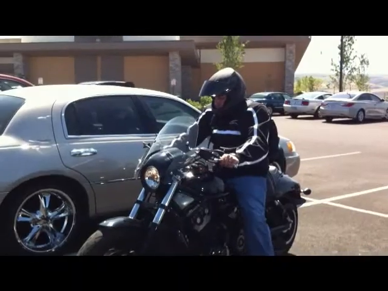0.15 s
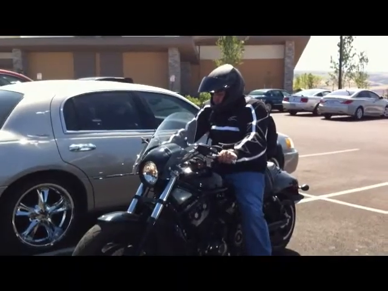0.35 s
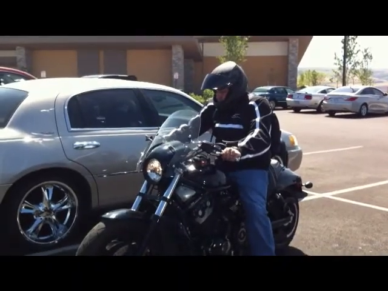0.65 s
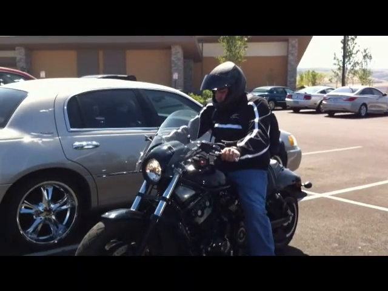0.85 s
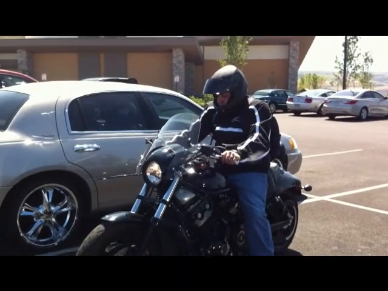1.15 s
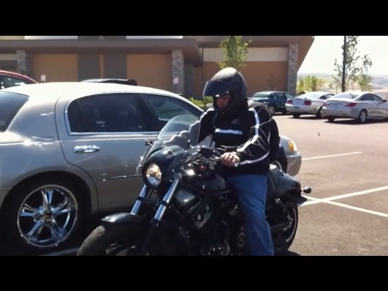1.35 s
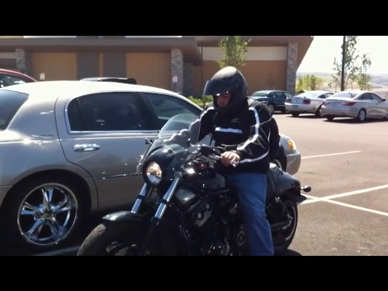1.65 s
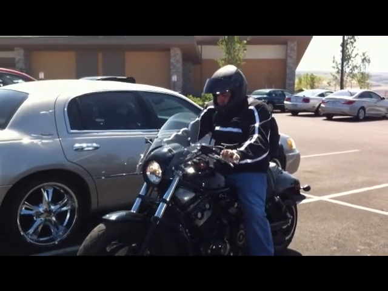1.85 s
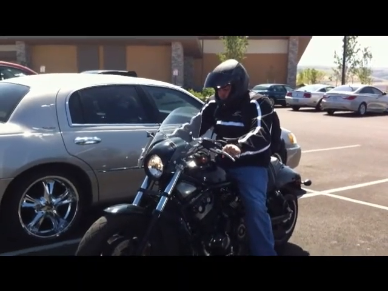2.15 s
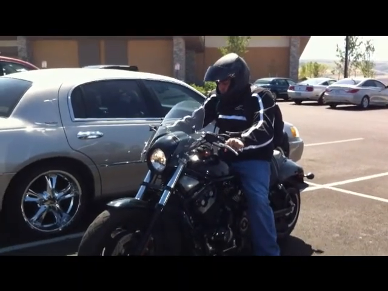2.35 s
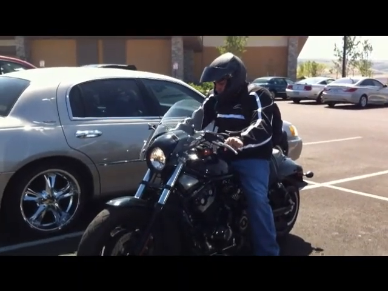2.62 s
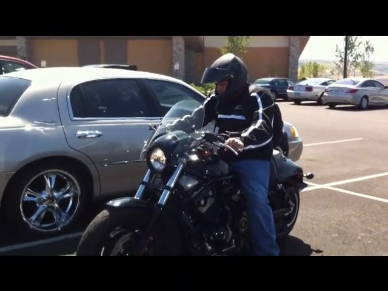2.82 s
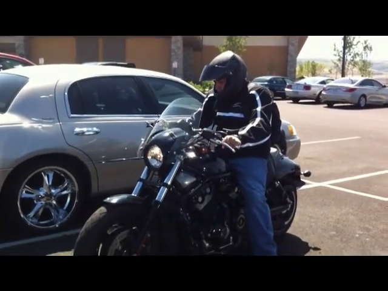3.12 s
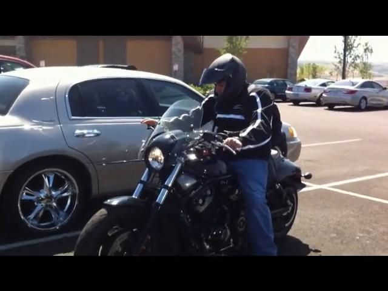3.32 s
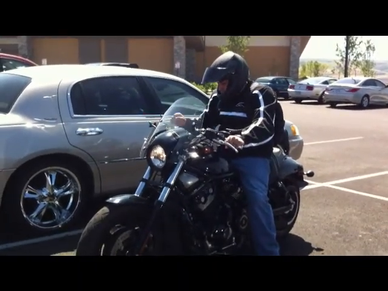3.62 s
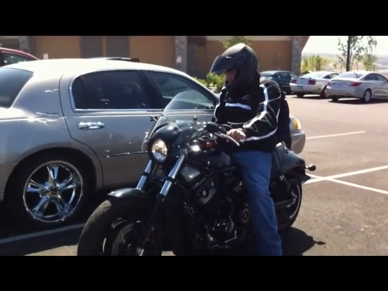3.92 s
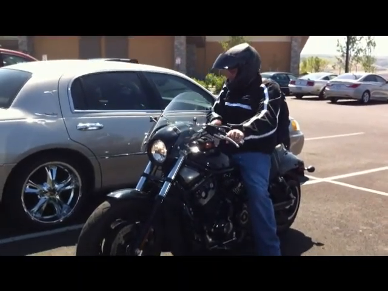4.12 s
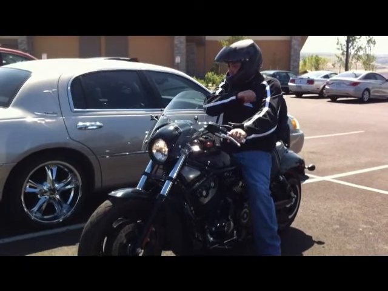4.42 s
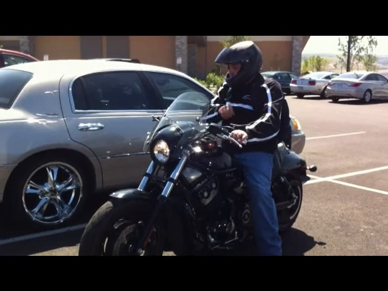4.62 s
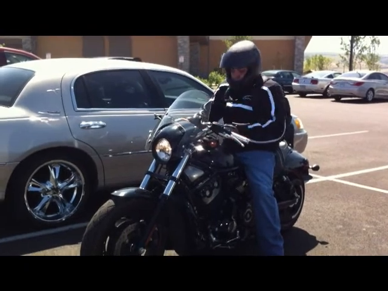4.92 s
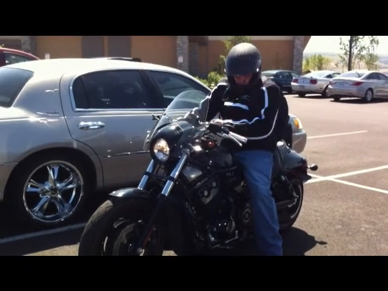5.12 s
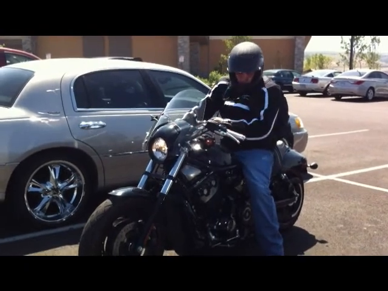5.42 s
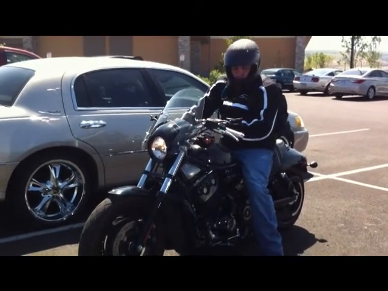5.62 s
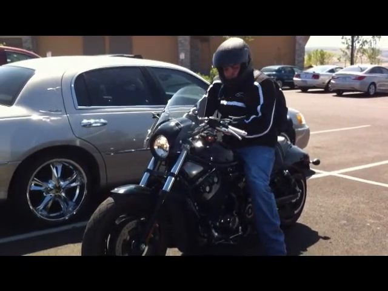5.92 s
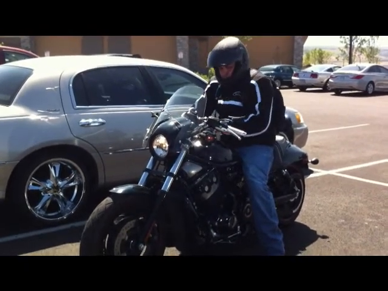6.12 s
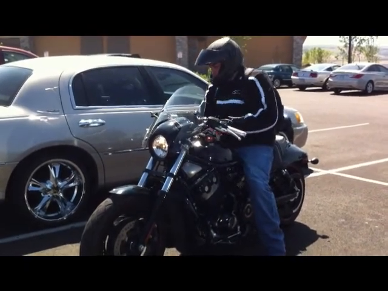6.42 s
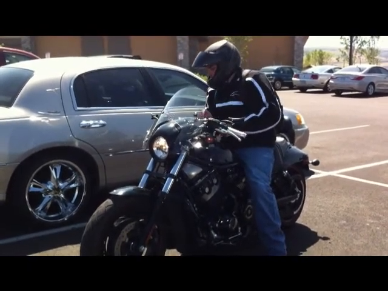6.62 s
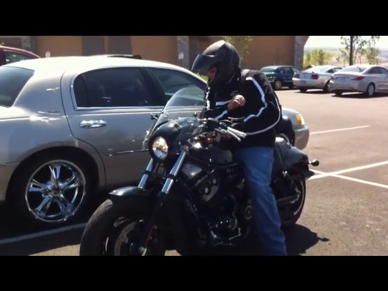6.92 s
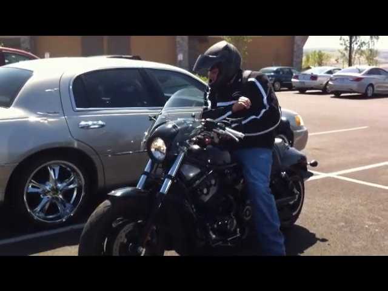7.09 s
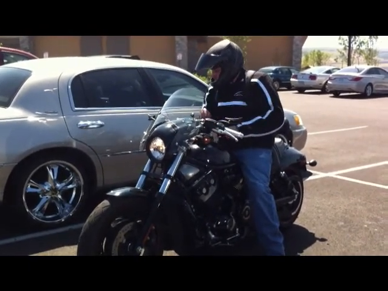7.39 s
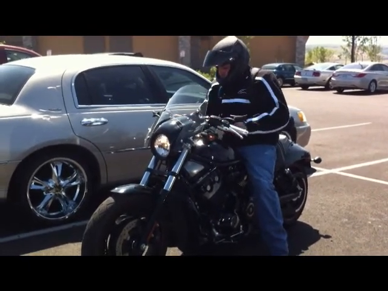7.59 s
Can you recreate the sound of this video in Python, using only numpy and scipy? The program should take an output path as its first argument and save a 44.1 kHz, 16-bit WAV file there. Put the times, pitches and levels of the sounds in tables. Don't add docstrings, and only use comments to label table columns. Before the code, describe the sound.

Faint distant traffic, then a quick metallic starter whine and hard clack as a two-cylinder motorcycle fires up close by. Three brief revs rise in pitch and force, each dropping back through stumbling, uneven firings. It then holds a slow, deep, galloping idle. Mechanical hiss, valve ticks, whining gears and thin chirps ride on top. The sound is outdoors, bouncing off asphalt, with a consumer microphone's dulled upper treble and one tiny splice click.

```python
import sys
import numpy as np
from scipy import signal
from scipy.fft import rfft, irfft, next_fast_len
from scipy.io import wavfile
from scipy.ndimage import map_coordinates

SR = 44100
rng = np.random.default_rng(int(sys.argv[2]) if len(sys.argv) > 2 else 0)


def amp(db):
    return 10 ** (np.asarray(db, float) / 20)


def write(x):
    x = np.atleast_2d(x).T
    wavfile.write(sys.argv[1], SR, np.round(np.clip(x, -1, 1) * 32767).astype(np.int16))


N = 341775
CUT, LOST = round(4.2365 * SR), round(.0163 * SR)
LONG = N + LOST
T = np.arange(LONG) / SR
SETTLED_S = 4.26
IDLE_RATE = 11.5
REAR_FIRES = .411

# f/Hz, level/dB per Hz
LOT_COLOUR = [(18, -67.5), (30, -21), (182, 5), (259, -4), (325, 1.5), (564, -17), (742, -11),
              (1140, -13.5), (12000, -38.5), (15600, -74), (22000, -120)]

# t/s, length/s, f/Hz, level/dB
GUARD_CHIRPS = [(.6, .2, 5420, 0), (1.5, .2, 5450, -2), (2.68, .08, 5520, -3), (2.99, .1, 5440, 0),
                (3.36, .14, 5450, -1), (3.55, .08, 5150, -3), (3.97, .15, 5480, -1), (5.2, .2, 4180, -2),
                (5.55, .12, 5850, -3), (6.65, .15, 5430, -1), (6.85, .06, 5520, -3), (7.38, .18, 5470, -1),
                (7.55, .15, 5700, -2)]

# share of the cycle, level/dB
ROCKER_KNOCKS = [(.2, -6), (0.297, -1.5), (.71, -3.5)]
# f/Hz, width/Hz, level/dB, polarity
ROCKER_COVER = [(2326, 100, 0.5, 0.95), (3100, 240, -6.5, -1.06)]

# f/Hz, level/dB per Hz
CASES_COLOUR = [(260, -21), (450, 1), (570, -7.5), (723, -14.5), (1210, -18), (1510, -15.5), (2160, -20),
                (2430, -15.5), (2820, -22.5), (3080, -21.5), (3900, -24), (12000, -35.5), (13500, -36.5),
                (15200, -47), (15500, -83)]
# share of the cycle, level/dB
VALVE_SEATINGS = [(0.208, 0), (0.319, 4.5), (.42, -21), (0.709, -8), (0.798, 0), (0.959, -0.5)]
# multiple of the cycle, level/dB
GEAR_MESH = [(44, -11), (63.7, -14), (131.5, 0)]
# share of the cycle, level/dB
GEAR_LOAD = [(0, -1), (.05, -4.5), (.15, 0), (.3, 2.5), (.45, 1), (.52, -6.5), (.72, -1), (.78, 1),
             (.93, 3), (1, -1)]
# f/Hz, level/dB per Hz
GROWL_COLOUR = [(1150, -4), (1300, 31), (1450, 17.5), (1700, 12), (1900, -30)]

# t/s, tooth mesh f/Hz, whine level/dB, grind level/dB
FIRST_COMPRESSION = [(.11, 480, -72, -43), (.15, 698, -37, -49.5), (.165, 764, -31, -45),
                     (.18, 875, -37, -44), (.19, 896, -27, -58), (.206, 863, -35, -45),
                     (.216, 750, -30, -50), (.232, 697, -39, -46), (.25, 647.5, -43, -48.5),
                     (.3, 689, -48, -50)]
# t/s, tooth mesh f/Hz, whine level/dB, grind level/dB
SECOND_COMPRESSION = [(.372, 760, -52, -50.5), (0.38, 735, -31, -42), (0.391, 760, -30, -46),
                      (0.399, 715, -24, -46), (0.41, 590, -27, -44), (.42, 505, -29, -46),
                      (0.432, 492, -40, -47), (.46, 443, -60, -43)]
# f/Hz, width/Hz, level/dB, polarity
STARTER_HOUSING = [(735, 80, -1, 1), (850, 70, -2, -1), (1150, 250, -5, 1), (1440, 170, 0, -1),
                   (1780, 90, 1, 1), (1980, 90, -1, -1), (2330, 150, -2, 1), (3000, 200, -12, -1),
                   (3550, 300, -9, 1)]
# f/Hz, level/dB per Hz
GRIND_COLOUR = [(100, -50), (600, -11.5), (900, -9.5), (1500, 0), (2500, -11.5), (4200, -20), (7000, -27),
                (15500, -33)]
# f/Hz, level/dB per Hz
RASP_COLOUR = [(2000, -22), (4500, 8), (7000, 11), (15500, -45)]
# t/s, peak level/dB
STARTER_CLACKS = [
    (0.116, -46),
    (0.383, -33),
    (0.4525, -24.5),
    (0.498, -42),
    (0.543, -34.5),
    (0.623, -39),
]
# f/Hz, level/dB, t60/s
STEEL_RINGS = [(1840, 12, 0.059), (5540, 9, 0.026), (7050, 11.5, 0.021), (10800, -21, .01)]

# t/s, rate/cycles per s
IDLE_SPEED = [(0.44, 10.792), (0.739, 11.918), (0.816, 11.602), (1.295, 12.065), (2.037, 13.724),
              (2.128, 12.919), (3.573, 14.588), (4.284, 12.349), (4.404, 10.583), (4.932, 12.09),
              (5.281, 10.73), (5.434, 11.386), (6.336, 11.714), (6.76, 10.85), (6.885, 11.122),
              (7.177, 12.136), (7.419, 11.04), (7.76, 11.07)]
# t/s, open/s, pull/cycles per s per s
THROTTLE_BLIPS = [
    (.522, .146, 21.70),
    (1.340, .152, 44.79),
    (2.161, .136, 68.06),
    (2.732, .118, 67.04),
]
# t/s, length/s, bark/dB, firing gain/dB, loss after shutting/dB
FULL_CHARGES = [
    (0.505, 0.14, -35.5, -2, -1.5),
    (1.376, 0.08, -34, -2, -7),
    (2.166, 0.142, -28.5, 3, -25.5),
    (2.774, 0.066, -30, 2.5, 1),
]
# t/s, front cylinder level/dB, rear cylinder level/dB
MIXTURE_STRENGTH = [(.44, 7, 0.5), (.62, -2.5, -8.5), (.8, -9, -9), (1.25, -3.5, -6.5), (1.7, -1, -5.5),
                    (2.08, -3.5, -11.5), (2.5, -1, -3), (3.1, -8, -4), (3.5, -1.5, -2.5), (3.7, -1, -9),
                    (4.15, -8.5, -5.5), (4.45, -3, -4), (4.95, -0.5, -6), (5.3, -2.5, -2.5),
                    (6.15, 0, -5.5), (6.75, -3.5, -1.5), (7.15, 1.5, -4.5), (7.6, -5, -1.5)]
# t/s, firings come earlier by/s
SPARK_ADVANCE = [(2.64, .0002), (2.69, .0012), (2.75, .0018), (2.78, .0002), (2.89, 0), (2.92, .0012),
                 (3.13, .0014), (3.2, .0001), (3.37, .0003), (3.53, .0011), (3.6, .0009), (3.65, .0002),
                 (3.9, .0002), (4.04, .0007), (4.2, .0003), (4.3, 0)]
# t/s, level/dB
ODD_FIRINGS = [(.627, 1), (.839, 2), (.988, 1), (1.216, 1), (1.325, 2), (1.542, -11), (1.619, 2),
               (1.767, -0.5), (1.791, -7), (1.85, -5), (1.91, -6), (1.971, -2), (2.135, 0.5), (2.163, 1.5),
               (2.298, -18), (2.317, 2), (2.343, 4.5), (2.389, -8), (2.662, -3), (2.748, 3), (2.943, -3.5),
               (2.969, -13), (2.988, -0.5), (3.061, 1.5), (3.08, -10), (3.109, 2.5), (3.229, -3.5),
               (3.281, -1), (3.334, -3), (3.365, 1.5), (3.387, 0.5), (3.42, 2), (3.442, -1.5),
               (3.498, -0.5), (3.532, 0.5), (3.555, -2), (3.589, -0.5), (3.613, -7), (3.647, 1),
               (3.672, -11), (3.733, -3), (3.77, -2), (4.034, 2), (4.062, -1.5), (4.176, 2.5), (4.206, -4),
               (4.31, 1), (4.776, -4), (4.907, 0), (5.249, -2.5), (5.429, 0.5), (5.516, 1.5), (6.07, 0.5),
               (6.641, -1), (6.914, -1), (7.611, 4),
               (0.582, 4.0), (0.697, 2.5), (0.839, 2.0), (0.87, 3.0), (0.913, 2.0), (0.944, -3.0),
                   (0.988, 2.0), (1.063, 2.0), (1.139, -1.5), (1.171, -1.5), (1.293, 3.0), (1.457, -2.5),
                   (1.489, -3.0), (1.564, 2.0), (1.675, -6.0), (1.732, -3.0), (1.791, -7.0), (1.85, -3.5),
                   (1.91, -6.0), (1.971, -3.0), (2.033, -4.5), (2.252, -3.5), (2.272, -4.0), (2.317, 2.5),
                   (2.343, -4.0), (2.408, -3.5), (2.436, 3.0), (2.662, -9.0), (2.694, 3.0), (2.716, -5.5),
                   (2.769, 5.0), (2.858, 3.0), (2.883, 3.5), (2.9, -4.5), (2.925, 3.5), (2.969, -8.0),
                   (3.015, 2.5), (3.08, -5.5), (3.109, 3.0), (3.129, -2.0), (3.158, -2.0), (3.208, 3.5),
                   (3.229, -2.5), (3.281, -6.5), (3.312, 3.0), (3.334, -5.0), (3.365, 3.5), (3.387, -4.0),
                   (3.442, -3.0), (3.475, 2.0), (3.498, -3.0), (3.532, 2.5), (3.555, -5.0), (3.613, -10.0),
                   (3.672, -8.0), (3.795, -5.0), (3.965, 2.0), (3.993, -3.0), (4.105, 2.0), (4.134, -2.5)]
# t/s, bark level/dB
ROUGH_POPS = [(.462, -46), (0.501, -21), (.62, -52), (.85, -34), (2.36, -41), (2.988, -40), (3.06, -50),
              (3.348, -50)]

# t/s, pulse level/dB, change of
# firing # level/dB
HARD_PULSES = [(.4566, -7, -8), (.4955, -7, -8), (.5472, -14, -6), (1.368, -8, -7), (1.3962, -9, -7),
               (1.433, -7, -7), (1.457, -12, -8), (1.489, -9, -3), (2.199, -7, -8), (2.2236, -7, -9),
               (2.2521, -7, -8), (2.2712, -7, -9), (2.769, -12, -6), (2.7977, -7, -6), (2.817, -7.5, -9),
               (2.8414, -7, -7), (2.8596, -8, -7)]
# f/Hz, level/dB per Hz
TORN_GAS_COLOUR = [(400, 4.5), (800, 2.5), (1500, -7.5), (3000, -11.5), (5000, -22), (9000, -48)]
# t/s, peak level/dB
VALVE_JETS = [(1.2116, -52), (1.3635, -29), (1.4286, -24), (1.4838, -30), (2.195, -24.5), (2.2243, -32),
              (2.248, -32), (2.7927, -26.5), (2.8379, -31), (2.8804, -35)]
# f/Hz, level/dB per Hz
JET_COLOUR = [(2500, -34), (5000, 3.5), (7000, 2), (12500, -5.5), (15500, -30)]

# f/Hz, width/Hz, level/dB, polarity
FRONT_PIPE = [(72.0, 14.0, -6.4, 1), (142.8, 14.0, 9.4, 1), (189.7, 16.5, 20.8, -1),
              (231.3, 32.4, 14.0, -1), (252.0, 14.0, 0.6, -1), (361.9, 27.1, 13.3, 1),
              (500.7, 15.7, 6.6, 1), (551.6, 20.1, -4.9, 1)]
# f/Hz, width/Hz, level/dB, polarity
REAR_PIPE = [(72.0, 20.1, -1.3, 1), (134.8, 31.2, 9.9, 1), (198.7, 150.0, 12.7, -1),
             (258.6, 30.9, 16.9, -1), (269.5, 24.0, 18.8, 1), (341.7, 32.9, 17.4, 1), (446.1, 76.2, 2.6, 1),
             (649.3, 14.0, -5.6, -1)]
# f/Hz, width/Hz, level/dB, polarity
HOT_PIPES = [(89.6, 14.0, -2.7, -1), (151.0, 18.2, 12.5, 1), (165.6, 20.5, 18.6, -1),
             (242.2, 69.2, 15.2, -1), (292.8, 24.1, 14.8, 1), (369.0, 62.0, 12.4, 1), (493.2, 14.0, 9.0, 1),
             (606.4, 134.0, -4.1, 1)]
# delay/s, gain
FRONT_ECHOES = [(0.00608, -0.84), (0.01934, -0.11), (0.02251, 0.26), (0.04757, 0.07)]
# delay/s, gain
REAR_ECHOES = [(0.00615, -0.94), (0.01657, 0.12), (0.02169, 0.16), (0.04735, 0.11)]
# delay/s, gain
HOT_ECHOES = [(0.00607, -0.72), (0.01944, 0.16), (0.02216, 0.06), (0.0468, 0.06)]
# f/Hz, width/Hz, level/dB, polarity
MUFFLER_SHELL = [(265.9, 4.3, 12.5, 0.86), (218.6, 43, 8.5, 0.31)]
# f/Hz, width/Hz, level/dB, polarity
PIPE_JUNCTION = [(478, 13, 0, 0.87), (287, 10.3, 3, 0.67)]
# f/Hz, width/Hz, level/dB, polarity
SHORT_SECTION = [(562, 34, -7, 0.55), (679, 44, -7.5, 0.7)]
# f/Hz, width/Hz, level/dB, polarity
TAILPIPE_MOUTH = [(430, 75, -8, -0.98), (1070, 220, -23, 0.054)]
# multiple of the cycle, level/dB
PISTON_PUMPING = [(5, -2), (7, -76), (9, -8), (10, -68)]
# f/Hz, level/dB per Hz
GAS_COLOUR = [(24, -75), (40, -65), (71, -10), (113, -20), (237, 3), (316, -22), (359, -1), (412, -25),
              (455, -17), (800, -34), (1040, -58), (1760, -120)]
# f/Hz, level/dB per Hz
CRACK_COLOUR = [(260, -61), (450, 0), (755, -12), (1060, -11), (1200, -15), (1370, -14), (3000, -32),
                (11800, -48), (14100, -60), (15500, -75)]
# f/Hz, level/dB
EXHAUST_TONE = [(395, 0), (432, -2), (475, 1.5), (518, -3), (560, 1), (675, 2.5), (740, -4), (810, 0)]

# t/s, f/Hz
TREBLE_TOP = [(0, 15100), (2.05, 15000), (2.15, 14300), (3.3, 14000), (4.2, 13500), (4.5, 13150),
              (7.75, 13100)]


def unit(x):
    return x / np.sqrt(np.mean(x ** 2) + 1e-20)


def noise():
    return rng.standard_normal(LONG)


def sample_of(s):
    return round(s * SR) + LOST * (s * SR > CUT)


def curves(rows):
    s, *columns = np.transpose(rows)
    at = s * SR + LOST * (s * SR > CUT)
    return [np.interp(np.arange(LONG), at, column) for column in columns]


def wobble(rate):
    knots = rng.standard_normal(int(LONG * rate / SR) + 4)
    return map_coordinates(knots, [np.arange(LONG) * rate / SR])


def fading(x, tau_s):
    return signal.lfilter([1 / SR], [1, -np.exp(-1 / (tau_s * SR))], x)


def filtered(x, response):
    m = next_fast_len(LONG + SR // 2)
    return irfft(rfft(x, m) * response(np.fft.rfftfreq(m, 1 / SR)), m)[:LONG]


def coloured(x, spectrum):
    f, db = np.transpose(spectrum)
    return unit(filtered(x, lambda hz: amp(np.interp(np.log(hz + 1), np.log(f + 1), db))))


def ringing(modes):
    def response(hz):
        return sum(polarity * amp(db) * 1j * hz * width / (centre * centre - hz * hz + 1j * hz * width)
                   for centre, width, db, polarity in modes)
    return response


def puffs(pulses, t60):
    return noise() * signal.lfilter([1], [1, -amp(-60 / (t60 * SR))], pulses)


def beats(cycles, share, level_db, scatter_s, scatter_db):
    at = np.searchsorted(cycles, np.arange(int(cycles[-1]) + 1) + share)
    chance = rng.standard_normal((len(at), 2))
    at = np.clip(at + np.round(scatter_s * SR * chance[:, 0]).astype(int), 0, LONG - 1)
    level = (level_db + np.zeros(LONG))[at] + scatter_db * chance[:, 1]
    return np.bincount(at, amp(level), LONG)


def throttle(rows):
    twist_s = .02
    return np.array([np.clip(np.minimum(T - s, s + open_s - T) / twist_s + .5, 0, 1)
                     for s, open_s, *_ in rows])


def speed():
    pull = np.array(THROTTLE_BLIPS)[:, 2] @ throttle(THROTTLE_BLIPS)
    return curves(IDLE_SPEED)[0] + fading(pull, tau_s=.547)


def crank(rate):
    turning = np.arange(LONG) > IDLE_SPEED[0][0] * SR
    return np.cumsum(rate * turning) / SR - .193


def parking_lot():
    return amp(-55.5 + 0.94 * wobble(12)) * coloured(noise(), LOT_COLOUR)


def belt_guard():
    out, sag = np.zeros(LONG), .04
    blur_hz, flutter = 55 * wobble(150), amp(4 * wobble(45))
    for s, lasts, hz, db in GUARD_CHIRPS:
        u, at = np.arange(round(lasts * SR)) / SR, sample_of(s)
        pitch = hz * (1 - sag * (u - lasts / 2)) + blur_hz[at:at + len(u)]
        swell = np.sin(np.pi * u / lasts) ** .5
        out[at:at + len(u)] += amp(db) * swell * np.sin(2 * np.pi * np.cumsum(pitch) / SR)
    return amp(-64.5) * flutter * out


def rockers(cycles):
    knocks = sum(beats(cycles, share, db, scatter_s=0.00089, scatter_db=2.0) for share, db in ROCKER_KNOCKS)
    return amp(-58) * unit(filtered(puffs(knocks, t60=.058), ringing(ROCKER_COVER)))


def case_clatter(cycles):
    ticks = sum(beats(cycles, share, db, scatter_s=0.0004, scatter_db=0.5) for share, db in VALVE_SEATINGS)
    return noise() * amp(0.68 * wobble(25)) + amp(-3.0) * puffs(ticks, t60=0.058)


def case_hiss(clatter, rate):
    grip, over, recover_s = throttle(FULL_CHARGES), rate - IDLE_RATE, .71
    shut_db = -28.5 * fading(grip.sum(0), recover_s) / recover_s
    hiss_db = -52.5 + 3.5 * grip[1:].sum(0) + shut_db + 0.29 * over
    hiss = coloured(clatter, CASES_COLOUR)
    air = unit(np.diff(hiss, 2, prepend=[0, 0]))
    return amp(hiss_db + 13.5) * (hiss + amp(-31.0 + 0.88 * over) * air)


def gear_whine(clatter, cycles, rate):
    def slack():
        return .013 * wobble(200)

    grips_s, takes_up_s = 1.38, .9
    lag = np.where(T < grips_s, .057, .027 * (T < SETTLED_S - .2)) + .012 * wobble(40)
    drive = 2 * np.pi * np.cumsum(rate * (1 - lag)) / SR
    mesh = 2 * np.pi * cycles
    *primary, (teeth, _) = GEAR_MESH

    whine_db = -49 - (rate - IDLE_RATE) + 2.5 * np.clip(T - SETTLED_S, 0, 2)
    whine_db = whine_db + np.interp(cycles % 1, *np.transpose(GEAR_LOAD))
    whine_db = whine_db + 2.5 * (T < grips_s)
    whine_db = whine_db - 9 * np.clip(2 * (takes_up_s - T) / .5, 0, 1)
    whine = amp(whine_db + 3 * wobble(50)) * np.sin(teeth * (drive + .7 * slack()))
    whine = whine + amp(whine_db - 13.5) * coloured(clatter, GROWL_COLOUR)

    coasting = np.clip(rate - 14.5, 0, 1) * (T > THROTTLE_BLIPS[2][0])
    overtone = np.sin(1.95 * teeth * (drive + .2 * slack()))
    whine = whine + coasting * amp(-64 + 5 * wobble(12)) * overtone

    primary_db = -45 + .75 * (np.minimum(rate, 20) - IDLE_RATE)
    upper_db = 3 + 4 * np.minimum(rate - 20.5, 0) - 30 * (T < THROTTLE_BLIPS[-1][0])
    for multiple, db in primary:
        level = amp(primary_db + db + upper_db * (multiple > primary[0][0]) + 3.5 * wobble(20))
        whine = whine + level * np.sin(multiple * (mesh + .95 * slack()))
    return whine


def starter_clack(peak_db):
    u = np.arange(SR // 10) / SR
    ring = sum(amp(db + 2 * rng.standard_normal() - 60 * u / t60) * np.sin(2 * np.pi * f * u)
               for f, db, t60 in STEEL_RINGS)
    crack = 3.0 * amp(-60 * u / 0.045) * np.diff(rng.standard_normal(len(u) + 1))
    return amp(peak_db - 16.0) * (ring + crack)


def starter():
    hz, whine_db, grind_db = curves(FIRST_COMPRESSION + SECOND_COMPRESSION)
    engaged = np.clip((T - STARTER_CLACKS[0][0]) / .006, 0, 1) * np.clip((.49 - T) / 0.023, 0, 1)
    turn = 2 * np.pi * np.cumsum(hz) / SR
    housing = ringing(STARTER_HOUSING)

    odd_db = np.where(T < SECOND_COMPRESSION[0][0], -6, -16)
    whine = np.zeros(LONG)
    for k in range(1, 7):
        level = amp(4 * wobble(70) + odd_db * (k % 2) - (k - 2))
        whine += np.abs(housing(k * hz)) * level * np.sin(k * (turn + .2 * wobble(160)))

    grind = coloured(noise() * amp(2.0 * wobble(450)), GRIND_COLOUR)
    grind = grind + amp(-8) * unit(filtered(grind, housing))
    rasp = coloured(noise() * amp(2.4 * wobble(197.6)), RASP_COLOUR)
    rasp_db = -55 + 1.44 * (whine_db + 36.0)
    out = engaged * (amp(rasp_db) * rasp + amp(whine_db) * whine + amp(grind_db + 7.5) * grind)

    chuff = coloured(noise(), [(20, -15), (60, 0), (250, -5), (600, -60)])
    out = out + amp(-45) * np.exp(-((T - .32) / .03) ** 2) * chuff
    for s, db in STARTER_CLACKS:
        clack = starter_clack(db)
        out[round(s * SR):][:len(clack)] += clack
    return out


def hard_pulses():
    out, u = np.zeros(LONG), np.arange(SR // 20) / SR
    turn = 2 * np.pi * 240 * u + 1.2 * (1 - np.exp(-u / .0009))
    pulse = -1.4 * (1 - np.exp(-u / .0006)) * np.exp(-u / .008) * np.sin(turn)
    jet = coloured(noise(), JET_COLOUR)
    torn = coloured(noise(), TORN_GAS_COLOUR)
    for s, db, _ in HARD_PULSES:
        at = sample_of(s)
        out[at:][:len(u)] += amp(db) * (pulse + amp(-23 - 60 * u / .098) * torn[at:][:len(u)])
    for s, db in VALVE_JETS:
        at = sample_of(s)
        out[at:][:len(u)] += amp(db - 10.5 - 60 * u / .027) * jet[at:][:len(u)]
    return out


def odd_firings():
    out, half = np.zeros(LONG), round(.007 * SR)
    softened = [(s, db) for s, _, db in HARD_PULSES]
    for s, db in ODD_FIRINGS + softened:
        at = sample_of(s)
        out[at - half:at + half] += db
    return out


def firing_levels():
    grip, recover_s = throttle(FULL_CHARGES), 0.17
    gain_db, loss_db = np.array(FULL_CHARGES)[:, 3:].T
    starved_db = fading(loss_db @ grip, recover_s) / recover_s * (1 - grip.sum(0))
    front_db, rear_db = np.array(curves(MIXTURE_STRENGTH)) + odd_firings()
    return front_db + gain_db @ grip + starved_db, rear_db + 2.6 * gain_db @ grip + starved_db


def pipe(pulses, modes, echoes):
    def response(hz):
        echo = 1 + sum(gain * np.exp(-2j * np.pi * hz * s) for s, gain in echoes)
        ends = (1j * hz / (60 + 1j * hz)) ** 2 / (1 + 1j * hz / 500) ** 2
        return ringing(modes)(hz) * echo * ends
    return amp(21.5) * filtered(pulses, response)


def pipe_thump(front, rear, hot, rear_edge, rate):
    both = front + rear
    cool = pipe((1 - hot) * front, FRONT_PIPE, FRONT_ECHOES) + pipe((1 - hot) * rear, REAR_PIPE, REAR_ECHOES)
    fast = filtered(pipe(hot * both, HOT_PIPES, HOT_ECHOES), lambda hz: 1 / (1 + (105 / (hz + 1)) ** 4))
    shell = pipe(amp(2 * (rate - 15.5)) * both, MUFFLER_SHELL, [])
    junction = pipe(hot * both, PIPE_JUNCTION, [])
    return cool + fast + shell + junction + pipe(front + rear_edge * rear, SHORT_SECTION, [])


def piston_pumping(cycles, rate):
    detuned = (PISTON_PUMPING[0][0] * rate - 82.2) / 12
    settled = np.clip((T - SETTLED_S) / .04, 0, 1)
    pump_db = -36 - 10 * np.log10(1 + detuned ** 4) - 1.5 * settled + 0.63 * wobble(16)
    strokes = sum(amp(db) * np.sin(2 * np.pi * k * cycles) for k, db in PISTON_PUMPING)
    return amp(pump_db) * (cycles > 0) * strokes


def exhaust_gas(cycles):
    strokes = beats(cycles, 0, 0, 0, 0.18) + beats(cycles, REAR_FIRES, 0, 0, 0.79)
    return amp(-33.0) * coloured(puffs(strokes, t60=0.41), GAS_COLOUR)


def bark_level(rate):
    floor = amp(-49.5 + 0.53 * (rate - IDLE_RATE) + 0.86 * wobble(10))
    charges = amp(np.array(FULL_CHARGES)[:, 2]) @ throttle(FULL_CHARGES)
    pops = sum(amp(db) * np.exp(-((T - sample_of(s) / SR) / 0.011) ** 2) for s, db in ROUGH_POPS)
    return 20 * np.log10(floor + charges + pops)


def bark(front, rear, hot, rear_edge, rate):
    bark_db = bark_level(rate)
    steep = amp(bark_db + 0.56 * (bark_db + 32.5))
    edges = front + (rear_edge + (1 - rear_edge) * hot) * rear
    snap = unit(filtered(edges, lambda hz: ringing(TAILPIPE_MOUTH)(hz) / (1 + 1j * hz / 1300) ** 2))
    crack = coloured(puffs(front + rear, t60=.03), CRACK_COLOUR)
    slug = unit(filtered(front + rear, lambda hz: 1j * hz / (20 + 1j * hz) / (1 + 1j * hz / 42.6) ** 3))
    out = steep * (amp(-17.0) * snap + amp(-0.5) * crack)
    out = out + amp(-44) * snap
    return amp(-4.0) * (out + steep ** 2 * amp(-25) * slug)


def exhaust(cycles, rate):
    front_db, rear_db = firing_levels()
    sparks = cycles + curves(SPARK_ADVANCE)[0] * rate
    front = beats(sparks, 0, front_db, scatter_s=0, scatter_db=1.22)
    rear = beats(sparks, REAR_FIRES, rear_db, scatter_s=0.00064, scatter_db=0.77)
    hot = np.clip((rate - 13.58) / 3.5, 0, 1)
    rear_edge = 0.14
    out = pipe_thump(front, rear, hot, rear_edge, rate) + bark(front, rear, hot, rear_edge, rate)
    return out + piston_pumping(sparks, rate) + exhaust_gas(sparks)


def exhaust_tone(x):
    f, db = np.transpose(EXHAUST_TONE)
    return filtered(x, lambda hz: amp(np.interp(np.log(hz + 1), np.log(f), db)))


def scene():
    rate = speed()
    cycles = crank(rate)
    clatter = case_clatter(cycles)
    mechanics = (cycles > 0) * (case_hiss(clatter, rate) + gear_whine(clatter, cycles, rate))
    whole = parking_lot() + belt_guard() + rockers(cycles) + mechanics
    whole = whole + starter() + hard_pulses() + exhaust_tone(exhaust(cycles, rate))
    kept = np.delete(whole, slice(CUT, CUT + LOST))
    since = np.arange(N) - CUT
    step = amp(-24) * (since >= 0) * np.exp(-np.abs(since) / (.006 * SR))
    return (kept + step)[None]


def thinned_treble(x):
    hz, t, z = signal.stft(x, SR, nperseg=1024)
    top = np.interp(t, *np.transpose(TREBLE_TOP))
    top = top + 330 * np.repeat(rng.standard_normal(len(t)), 2)[:len(t)]
    luck = np.repeat(rng.random((len(hz), len(t))), 5, 0)[:len(hz)]
    luck = np.repeat(luck, 3, 1)[:, :len(t)]
    holes_from_hz = 6000
    near = np.clip((hz[:, None] - holes_from_hz) / (top - holes_from_hz), 0, 1)
    risk = .07 * near + .3 * near ** 12 + .3 * (hz[:, None] > 12900)
    lost = (near >= 1) | (luck < risk)
    at_splice = np.abs(t - CUT / SR) < .012
    return signal.istft(z * (~lost | at_splice), SR, nperseg=1024)[1][..., :N]


def top_cut(x):
    return signal.sosfilt(signal.butter(12, 15610, fs=SR, output="sos"), x)


def record(dry):
    soft = dry / (1 + np.abs(dry / .52) ** 6) ** (1 / 6)
    soft = signal.sosfilt(signal.butter(N=10, Wn=15300, fs=SR, output="sos"), soft)
    return top_cut(thinned_treble(soft))


dry = scene()
out = record(dry)
write(out)
```